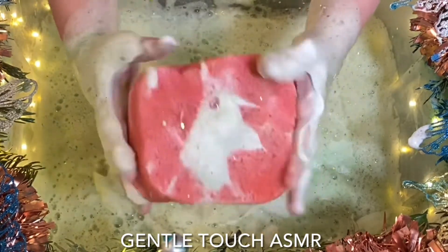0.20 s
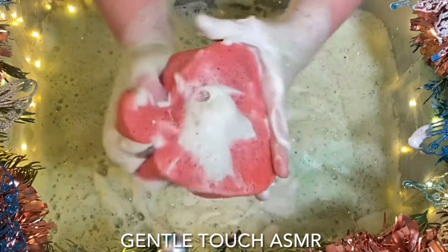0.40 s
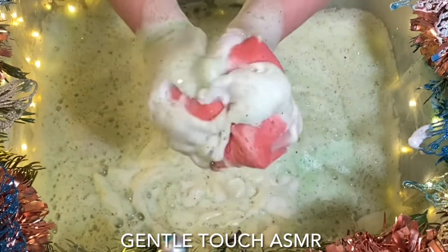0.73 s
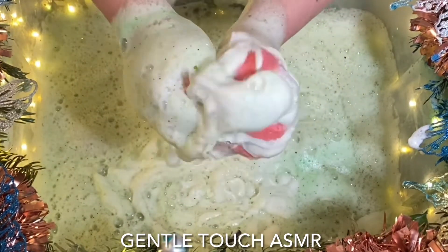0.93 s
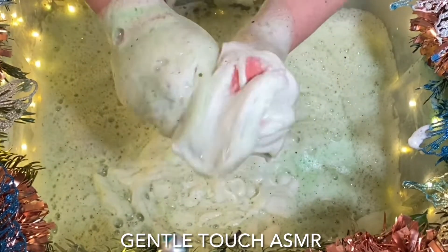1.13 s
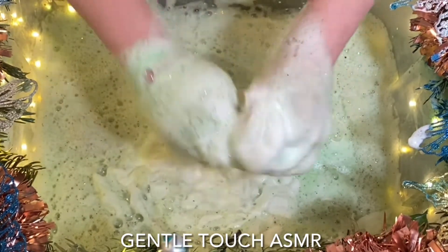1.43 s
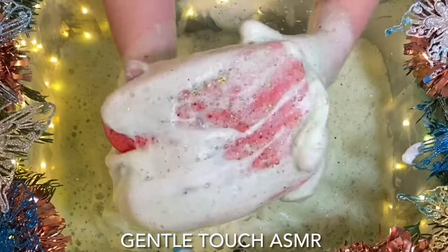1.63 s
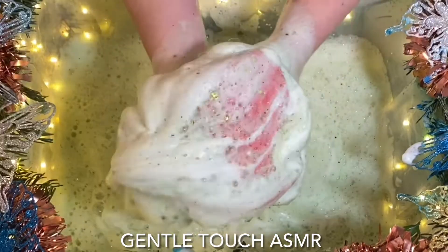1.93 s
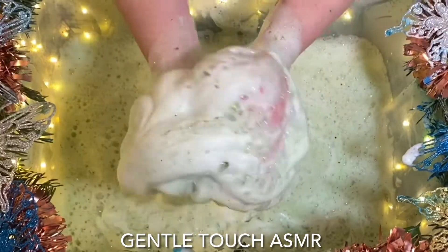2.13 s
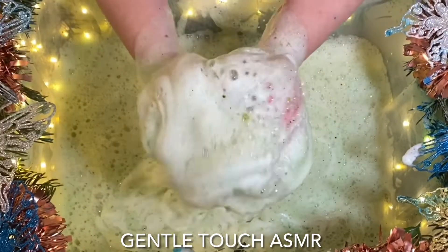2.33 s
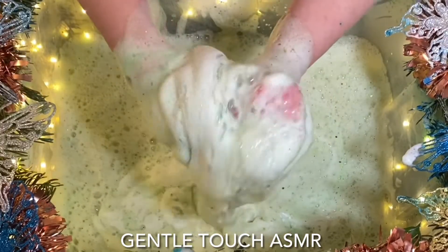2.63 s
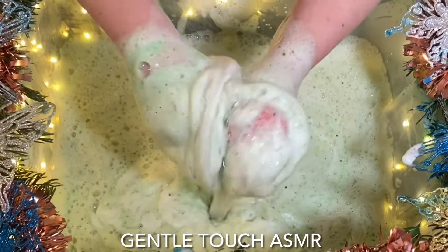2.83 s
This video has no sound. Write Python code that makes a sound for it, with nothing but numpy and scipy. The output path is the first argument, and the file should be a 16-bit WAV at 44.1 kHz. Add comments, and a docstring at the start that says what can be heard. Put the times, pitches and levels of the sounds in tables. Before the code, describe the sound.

Wet foam squelch from a squeezed sponge, twice, each ebbing into small spits, pops and plops.

```python
"""Two hands squeeze a soap-soaked sponge twice over a tub of thick foam, close to one microphone.
The first squeeze drives out fizzing foam, a wet squelch of small bubbles and a low gurgle: random bursts
through colour filters. As it ebbs, air pockets spit and bubbles pop and plop: sprays and decaying rings.
The sound fades out for an instant, then the second squeeze swells with gushes of bubbles and ebbs into
more spits, pops and plops. Surface crackle and a faint room rumble, both filtered noise, lie beneath."""
import sys
import numpy as np
from scipy import signal
from scipy.fft import rfft, irfft, next_fast_len
from scipy.io import wavfile

SR = 44100
rng = np.random.default_rng(int(sys.argv[2]) if len(sys.argv) > 2 else 0)


def bounce(signal):
    """Save signal as a 16-bit WAV file at the path given by the first command-line argument."""
    frames = np.transpose(np.atleast_2d(signal))
    limited = np.clip(frames, -1, 1)
    pcm = np.round(limited * 32767).astype(np.int16)
    wavfile.write(sys.argv[1], SR, pcm)


N = 132300  # 3 s
T = np.arange(N) / SR

# wet bubbles between the fingers, before the layer trims, one list per squeeze: (time [s], level [dB])
SQUELCH_LEVELS = [
    [(0, -64), (.06, -65), (.13, -77), (.22, -68), (.28, -54), (.48, -48), (.56, -58), (.82, -57),
     (.98, -65), (1.11, -61), (1.16, -58), (1.22, -63.5), (1.38, -71), (1.41, -77), (1.47, -55.5)],
    [(1.56, -64), (1.63, -62.5), (1.68, -53.5), (1.8, -48.5), (1.89, -45), (1.98, -46), (2.1, -53.5),
     (2.29, -51.5), (2.43, -58), (2.6, -62.5), (2.73, -58.5), (2.8, -65), (2.89, -63), (2.95, -69),
     (3, -68)],
]
FLOW_DB = -60  # reference level of the flow: burst rates and crackle are set here


def amp(db):
    """Decibels to gain."""
    return 10 ** (np.asarray(db) / 20)


def unit(x):
    """Scale to rms 1."""
    return x / np.sqrt(np.mean(x ** 2) + 1e-20)


def level(squeezes):
    """The dB curves of both squeezes, one value per sample."""
    time_s, db = np.vstack(squeezes).T
    return np.interp(T, time_s, db)


def random_signs(count):
    """Random polarity: half the bursts push, half pull."""
    return rng.choice([-1, 1], count)


def coloured(x, colour):
    """Causal minimum-phase filter of unit energy through (frequency [Hz], level [dB]) points."""
    size = 4096
    hz, db = np.transpose(colour)
    log_bins = np.log(np.fft.rfftfreq(size, 1 / SR) + 1)
    spectrum_db = np.interp(log_bins, np.log(hz), db)
    # folding the cepstrum onto positive time puts the energy at the start
    cepstrum = irfft(np.log(amp(spectrum_db)))
    cepstrum[1:size // 2] *= 2
    cepstrum[size // 2 + 1:] = 0
    response = irfft(np.exp(rfft(cepstrum)))
    return signal.fftconvolve(x, response / np.linalg.norm(response))[:N]


def bubbles(s, gain, hz, cycles):
    """Pressure of pulsing cavities, each dying by 60 dB in so many cycles and cut after 20 ms."""
    t = np.arange(SR // 50) / SR
    turns = np.clip(hz, 100, SR / 3)[:, None] * t
    decay = amp(-60 * turns / cycles)
    soft_start = 1 - np.exp(-4 * turns)
    flow = np.sin(2 * np.pi * turns) * decay * soft_start
    rings = np.diff(flow, axis=1, prepend=0)  # pressure follows the change of flow
    rings = gain[:, None] * rings / np.abs(rings).max(axis=1, keepdims=True)
    at = np.round(s * SR).astype(int)[:, None] + np.arange(len(t))
    return np.bincount(np.maximum(at, 0).ravel(), rings.ravel(), N)[:N]


def cluster(s, gain, hz, spread, cycles):
    """Bubbles of scattered size, hence pitch, around one centre; spread is in natural-log units."""
    draw = rng.standard_normal((len(s), 2))
    signs = np.sign(draw[:, 0])
    pitches = hz * np.exp(spread * draw[:, 1])
    return bubbles(s, gain * signs, pitches, cycles)


def foam(squeezes, colour, per_s, scatter_db, smooth):
    """Countless tiny bursts over a smooth hiss; more flow makes them denser and louder."""
    crowding = 1.1  # how steeply the burst rate grows with the level
    db = level(squeezes)
    rate = per_s * amp(crowding * (db - FLOW_DB))
    chance = np.clip(rate / SR, 1e-4, 1)  # per sample
    spread_db = scatter_db * np.minimum(rng.exponential(size=N), 4)
    sizes = unit(amp(spread_db)) * random_signs(N)
    # dividing by the root of the chance keeps the power even as the density changes
    bursts = unit((rng.random(N) < chance) * sizes / np.sqrt(chance))
    hiss = smooth * rng.standard_normal(N)
    return amp(db) * coloured(unit(bursts + hiss), colour)


def rumble():
    """Faint room rumble: steady noise weighted to the lows."""
    # room colour: (frequency [Hz], level [dB])
    rumble_colour = [(15, 3), (30, -1.5), (48, -1), (62, -5.5), (90, -8.5), (250, -13), (1000, -44),
                     (15000, -27)]
    return amp(-70) * coloured(rng.standard_normal(N), rumble_colour)


def crackle():
    """Stray surface bubbles tick all the time, harder while the foam is moving."""
    # tick colour: (frequency [Hz], level [dB])
    crackle_colour = [(300, -13.5), (1200, -3), (2600, 10), (5000, -2.5), (10000, -11.5), (15500, -39)]
    ticks_per_s, scatter_db = 120, 27
    crackle_db, follow = -71, 1  # level at the reference flow, dB per dB of squelch
    sizes = amp(scatter_db * rng.random(N)) * random_signs(N)
    ticks = (rng.random(N) < ticks_per_s / SR) * sizes
    db = crackle_db + follow * (level(SQUELCH_LEVELS) - FLOW_DB)
    return amp(db) * coloured(unit(ticks), crackle_colour)


def tub(x):
    """Add the short, dense echo of the tub walls: exponentially decaying noise."""
    t60_s, echo_db = 0.041, -9.5
    t = T[:SR // 4]
    tail = rng.standard_normal(len(t)) * amp(-60 * t / t60_s)
    echo = signal.fftconvolve(x, tail / np.linalg.norm(tail))[:N]
    return x + amp(echo_db) * echo


def plops():
    """Large, foam-damped cavities of suds in the tub ring low with a soft start."""
    # soft plops, level before the soft start: (time [s], level [dB], pitch [Hz])
    plop_table = [(1.147, -41, 450), (1.145, -45.5, 170), (1.325, -44, 334), (1.386, -63, 237),
                  (1.563, -48, 248), (2.298, -48, 265), (2.382, -49, 272), (2.479, -43.5, 282),
                  (2.565, -31, 537), (2.571, -46, 275), (2.71, -49, 245), (2.72, -46.5, 130)]
    cycles, rise_s = 8.3, 0.00056  # cycles to fall by 60 dB, time constant of the start
    out = np.zeros(N)
    for s, db, hz in plop_table:
        t = np.maximum(T - s, 0)
        decay = amp(db - 60 * hz * t / cycles)
        soft_start = 1 - np.exp(-t / rise_s)
        out += decay * soft_start * np.sin(2 * np.pi * hz * t)
    return out


def pops():
    """The film tears with a tiny snap and the opened cavity rings for a few cycles."""
    # single bubbles bursting:
    # (time [s], ring peak [dB], pitch [Hz], life to -60 dB [cycles], film snap over the ring [dB])
    pop_table = [(.006, -47.5, 2940, 7.5, 5), (0.03, -50, 2980, 3.4, 13), (.157, -54, 2500, 3, 16.5),
                 (.187, -49.5, 3000, 2.3, 13), (0.967, -37.5, 1600, 2.5, -20), (.990, -56, 4000, 3, 8),
                 (1.041, -46, 2550, 14, -4), (1.063, -40.5, 1110, 1.9, -10), (1.065, -45, 2470, 17, -12),
                 (1.115, -38, 2240, 9, -21), (1.1825, -39, 1600, 8, -12), (1.201, -59, 2150, 14, -2),
                 (1.3284, -34, 4180, 22, 1), (1.545, -43.5, 3400, 5, 1), (1.815, -34.5, 1400, 9, -20),
                 (1.834, -33.5, 1250, 9.3, -10), (1.876, -37.5, 2550, 12, -2),
                 (1.887, -32.5, 1370, 4.6, -6), (1.894, -32, 2540, 12, -17), (1.914, -30.5, 1370, 3.6, -9),
                 (2.075, -37, 2500, 1.9, 4), (2.5655, -23, 1610, 3.7, -1.5), (2.5675, -32.5, 910, 4.1, -26)]
    # a tearing film: (frequency [Hz], level [dB])
    snap_colour = [(200, -14), (1000, 3.5), (2500, 2), (4600, -14), (7000, -0.5), (10500, 4), (12500, -10),
                   (15500, -11)]
    s, db, hz, cycles, snap_db = np.transpose(pop_table)
    snaps = np.bincount(np.round(s * SR).astype(int), amp(db + snap_db), N)
    rings = bubbles(s, amp(db), hz, cycles[:, None])
    return rings - coloured(snaps, snap_colour)


def spits():
    """An air pocket tears open in a quickly dying spray of bubbles."""
    # air pockets spitting through the foam, level before the trim:
    # (time [s], level [dB], centre pitch [Hz], decay [s])
    spit_table = [(.963, -41.5, 2320, 0.0049), (1.030, -42, 3400, 0.0015), (1.041, -45.5, 3800, 0.0043),
                  (1.063, -52, 2400, .003), (1.084, -49, 2700, 0.0029), (1.110, -47, 2700, 0.0054),
                  (1.124, -55, 3200, 0.0022), (1.148, -42.5, 880, .004), (1.3265, -31.5, 3080, 0.0057),
                  (2.160, -38, 1400, .005), (2.234, -41, 3070, 0.0056), (2.397, -38.5, 2320, .004),
                  (2.482, -40.5, 910, 0.002), (2.560, -35.5, 1570, .003), (2.5707, -34.5, 1900, .005),
                  (2.587, -42, 1100, 0.0033)]
    per_s, cycles, spread, trim_db = 6000, 2.2, 0.63, -10.5
    out = np.zeros(N)
    for s, db, hz, decay_s in spit_table:
        u = np.sort(rng.uniform(0, 3, int(3 * decay_s * per_s)))  # time in decays
        spray = cluster(s + decay_s * u, np.exp(-u * u / 2), hz, spread, cycles)
        # rms is set over one decay, whatever its length
        out += amp(db + trim_db) * unit(spray) * np.sqrt(decay_s * SR / N)
    return out


def gushes():
    """A swell of ringing bubbles as suds escape the tightening grip."""
    # gushes of suds:
    # (time [s], half length [s], level [dB], centre pitch [Hz], bubble rate [1/s])
    gush_table = [(.315, .045, -58, 10500, 5100), (0.476, .03, -45.5, 900, 2160),
                  (0.483, .03, -49, 410, 1060), (1.704, .05, -55, 1050, 1200),
                  (1.746, .025, -64, 9000, 6000), (1.831, 0.048, -53, 1230, 870),
                  (1.892, .028, -48, 2010, 1200), (2.713, .012, -59.5, 1820, 1500)]
    cycles, spread = 6.2, 0.3
    out = np.zeros(N)
    for s, half_s, db, hz, per_s in gush_table:
        u = np.linspace(-1.5, 1.5, int(3 * half_s * per_s))  # time in half lengths
        u = u + rng.uniform(-0.81, 1, len(u)) / (half_s * per_s)  # uneven spacing
        swell = np.exp(-u ** 4 / 2)
        gush = cluster(s + half_s * u, swell, hz, spread, cycles)
        # rms is set over the full length of the gush
        out += amp(db) * unit(gush) * np.sqrt(2 * half_s * SR / N)
    return out


def gurgle():
    """Liquid churning in the sponge: sparser bursts in a low colour."""
    # low gurgle, one list per squeeze: (time [s], level [dB])
    gurgle_levels = [
        [(0, -75.5), (.22, -79.5), (.33, -60), (.47, -51.5), (.55, -60.5), (.64, -68), (1.1, -67.5),
         (1.28, -73.5), (1.35, -67), (1.47, -65.5)],
        [(1.56, -69), (1.62, -75.5), (1.72, -59.5), (1.87, -57.5), (2.08, -63), (2.24, -64.5), (2.33, -58),
         (2.53, -63.5), (2.73, -59.5), (2.8, -65), (3, -70.5)],
    ]
    # gurgle colour: (frequency [Hz], level [dB])
    gurgle_colour = [(40, -28), (90, -11.5), (125, -3), (180, -6.5), (255, 2), (350, -7.5), (460, -4),
                     (620, -13.5), (1200, -36), (4000, -33)]
    return foam(gurgle_levels, gurgle_colour, per_s=1000, scatter_db=2.5, smooth=0.44)


def fizz():
    """Fine foam leaving the sponge: dense bursts in a bright colour."""
    # fine foam before the trim, one list per squeeze: (time [s], level [dB])
    fizz_levels = [
        [(0, -70.5), (.04, -67.5), (.11, -73), (.22, -66), (.265, -52), (.33, -49), (.5, -52), (.62, -56),
         (.83, -57.5), (.96, -66), (1.17, -79.5), (1.25, -67.5), (1.37, -62.5), (1.47, -58)],
        [(1.56, -66.5), (1.67, -64.5), (1.73, -57.5), (1.92, -58.5), (2.12, -62.5), (2.27, -61.5), (2.48, -67),
         (2.72, -66), (2.81, -72.5), (2.88, -67.5), (2.94, -70), (3, -66.5)],
    ]
    # fizz colour: (frequency [Hz], level [dB])
    fizz_colour = [(200, -9), (600, -22.5), (1200, -0.5), (3300, 0.5), (5000, -1.5), (7000, -4.5),
                   (10300, -5.5), (12500, -10), (15500, -17.5)]
    trim_db = 4.5
    return amp(trim_db) * foam(fizz_levels, fizz_colour, per_s=5000, scatter_db=3.5, smooth=0.68)


def ringing():
    """Larger bubbles in the squelch ring briefly, each at its own pitch."""
    per_s, hz, spread, cycles = 600, 1970, 0.531, 8.7
    scatter_db, trim_db = 15.5, -7
    draw = rng.random((int(per_s * N / SR), 2))
    times = draw[:, 0] * N / SR
    sizes = amp(scatter_db * draw[:, 1] ** 2)
    swarm = cluster(times, sizes, hz, spread, cycles)
    return amp(level(SQUELCH_LEVELS) + trim_db) * unit(swarm)


def squelch():
    """Wet bubbles bursting between the fingers, strongest in the mids."""
    # squelch colour: (frequency [Hz], level [dB])
    squelch_colour = [(150, -16), (450, -3), (630, -1.5), (900, 3.5), (1400, -1), (1950, -3), (2500, -1.5),
                      (3200, -7.5), (5000, -10.5), (9000, -20), (15000, -35.5)]
    trim_db = -3
    return amp(trim_db) * foam(SQUELCH_LEVELS, squelch_colour, per_s=2500, scatter_db=2.0, smooth=0.52)


def scene():
    """All layers meet at one microphone; the separate bubbles also echo in the tub."""
    background = rumble() + crackle()
    bursts = plops() + pops() + spits() + gushes() + ringing()
    squeezing = gurgle() + fizz() + squelch()
    mono = background + tub(bursts) + squeezing
    return np.array([mono, mono])


def record(dry):
    """A brief fade out and in between the squeezes, then the band limit."""
    fade_at_s, fade_out_s, fade_in_s = 1.517, 0.054, 0.035
    fade_left = 0.02  # gain at the bottom of the fade
    top_hz = 15800
    falling = (fade_at_s - T) / fade_out_s
    rising = (T - fade_at_s) / fade_in_s
    fade = np.clip(np.maximum(falling, rising), fade_left, 1)
    size = next_fast_len(N + SR // 2)
    passed = np.fft.rfftfreq(size, 1 / SR) < top_hz
    return irfft(rfft(dry * fade, size) * passed, size)[:, :N]


dry = scene()
out = record(dry)
bounce(out)
```